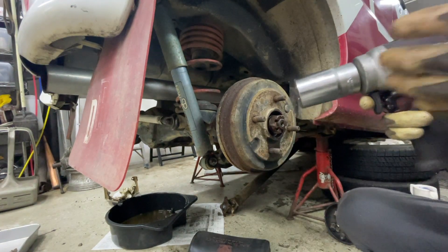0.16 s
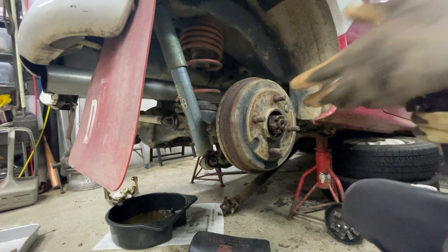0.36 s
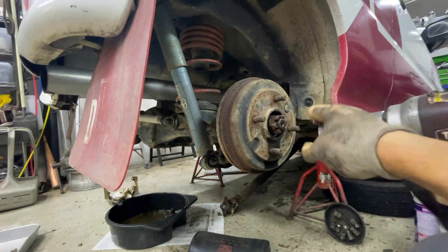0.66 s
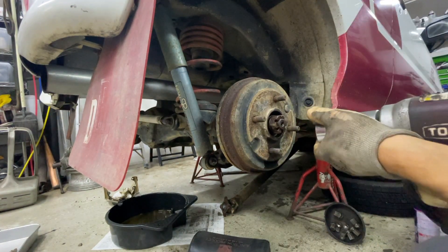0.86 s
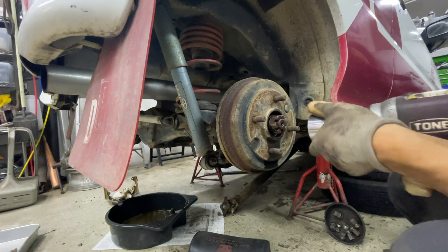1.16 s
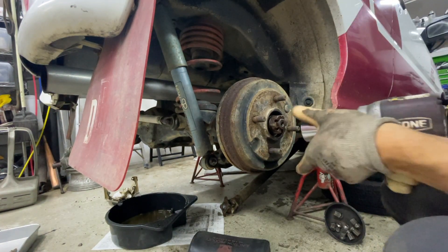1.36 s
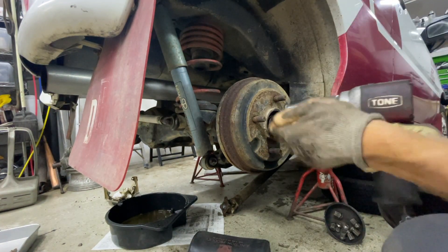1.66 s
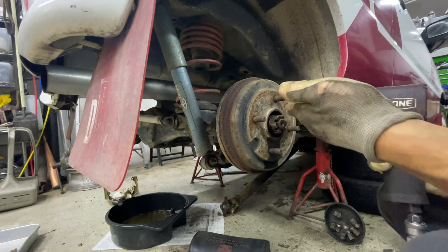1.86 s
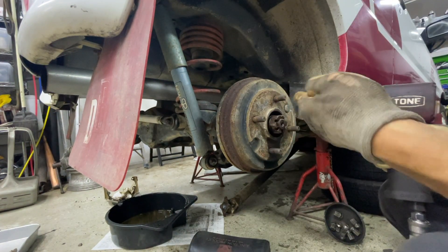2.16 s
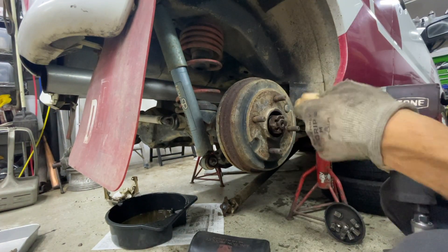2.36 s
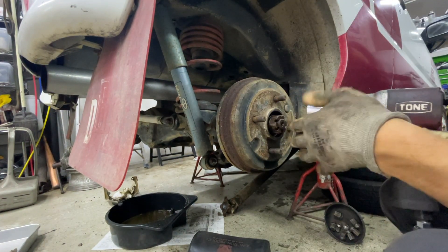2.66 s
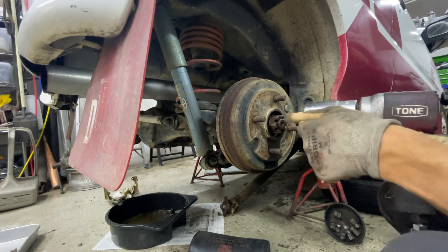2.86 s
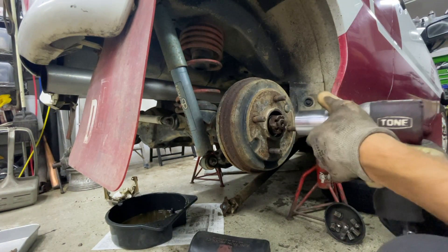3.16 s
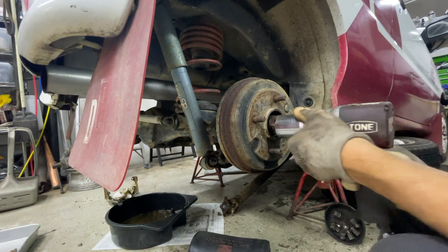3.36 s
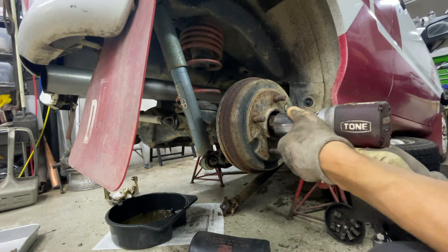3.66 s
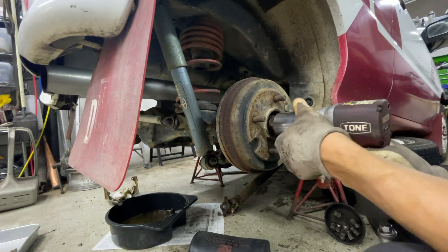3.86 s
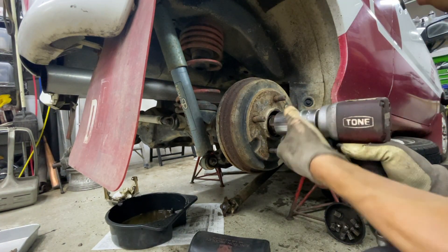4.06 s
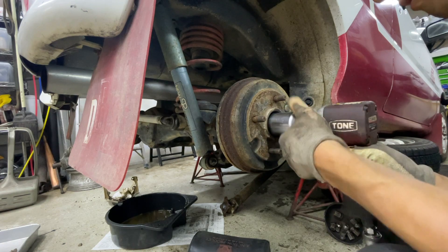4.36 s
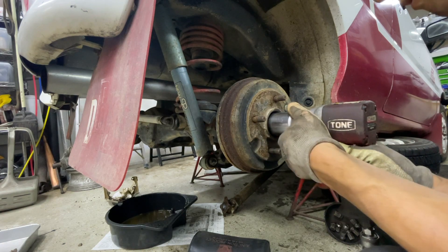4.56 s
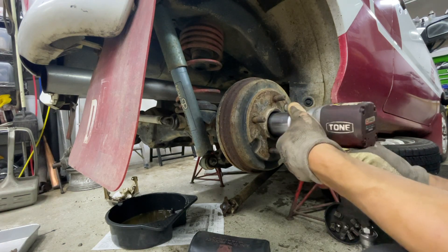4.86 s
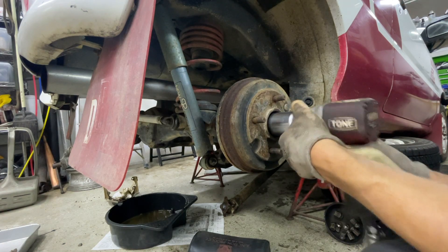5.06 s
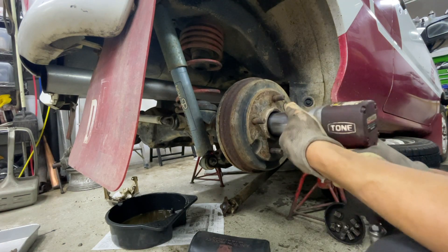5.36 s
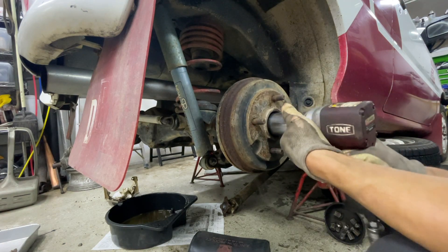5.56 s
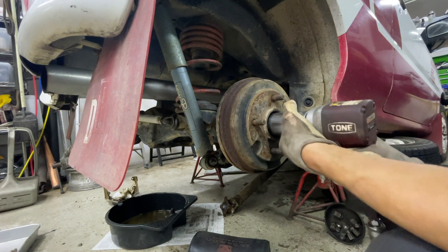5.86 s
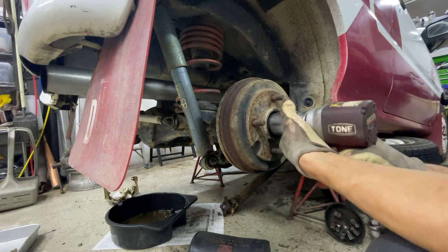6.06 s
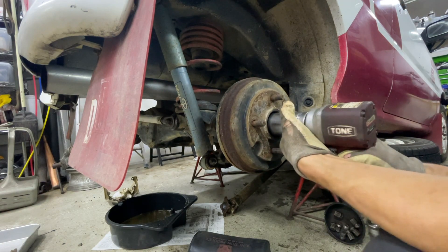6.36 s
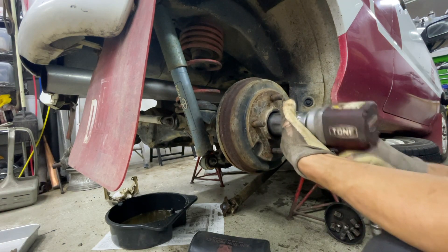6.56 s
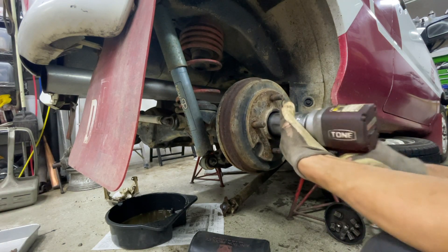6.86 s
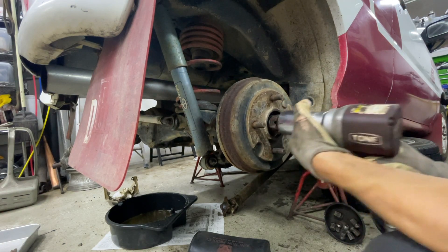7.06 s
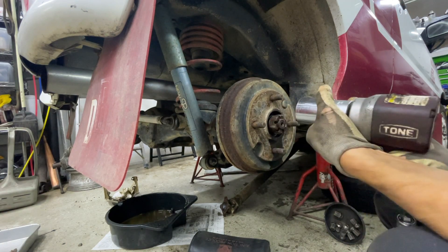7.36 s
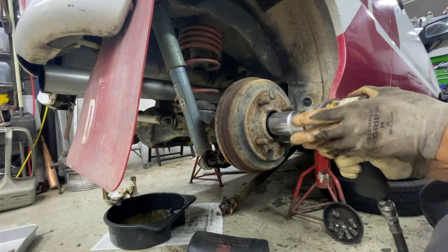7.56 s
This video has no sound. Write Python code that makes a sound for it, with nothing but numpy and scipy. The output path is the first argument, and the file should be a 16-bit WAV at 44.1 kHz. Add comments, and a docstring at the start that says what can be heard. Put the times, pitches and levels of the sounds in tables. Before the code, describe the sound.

Over a chugging compressor, a close air impact wrench gives a quick blip, then rattles loudly against a wheel hub nut, pausing briefly twice.

```python
"""Impact wrench and air compressor in a garage

Close by, an air impact wrench is blipped once, then hammers on a tight hub nut in three bursts.
Each impact excites a broad crack and the damped modes of socket, anvil and brake drum; the exhaust
hisses, and early puffs of it thump against the microphone. A piston compressor chugs in harmonics
of its crank rate and sinks behind the wrench while that is loud."""
import sys
import numpy as np
from scipy import signal
from scipy.fft import rfft, irfft, next_fast_len
from scipy.io import wavfile
from scipy.ndimage import uniform_filter1d

SR = 44100
rng = np.random.default_rng(int(sys.argv[2]) if len(sys.argv) > 2 else 0)


def wav_record(signal):
    """Record a signal, one row per channel, as 16-bit PCM in the file named by sys.argv[1]."""
    frames = np.transpose(np.atleast_2d(signal))
    bounded = np.clip(frames, -1, 1)
    # unit amplitude maps onto the largest positive 16-bit level
    quanta = np.round(bounded * 32767).astype(np.int16)
    wavfile.write(sys.argv[1], SR, quanta)


N = 340359
T = np.arange(N) / SR

# Hammer blows: t/s, level/dB, then relative to it hub/dB, socket/dB, anvil/dB, settling parts/dB
BLOWS = [(4.608, -20.5, -2.5, -16, 0.5, -8), (4.622, -17, 1, 1.0, -5.5, 2.5),
         (4.6376, -14, -1.5, -1, -9, -12), (4.652, -17, -4, 5, -1.5, -17),
         (4.696, -15, -11.5, -4, -1.0, -3), (4.737, -16.5, -6.5, 1, -7.5, -5),
         (4.784, -13.5, -8, 2.5, -8, -3.5), (4.9315, -16, -10, 2, -4, -15), (4.9804, -17, -7, 4, 0, -12),
         (5.026, -15, -6.5, 4, 0, -12), (5.0718, -18, -10, -7, -2, -2), (5.1174, -18.5, -13.5, -2, -2, -4),
         (5.1698, -21.5, -9, 2, -3, 2), (5.218, -19, -13.0, 0, 4, -2), (5.266, -16.5, -12.5, -9, -4, -3),
         (5.309, -18, -8.5, -7, -2, -2), (5.358, -17, -12.5, -9, -3.0, -13),
         (5.4045, -18.5, -14, 6, 1, -12), (5.453, -15.5, -13, -2, -3.0, -8), (5.5, -19.0, -23, 3, 5, -7),
         (5.5509, -19, -19, -3, -7.5, -11), (5.605, -18, -19.5, 2, 2, -2.5), (5.656, -18, -23, -2, 2, 0),
         (5.7095, -19, -22, -1, -1, -8), (5.7542, -16, -34, -2.5, -1, -6),
         (5.7989, -23, -15, -5, -1.5, -15), (5.8449, -17.5, -17, -6, 0, -13),
         (5.89, -19.5, -11, -4, -2, -14), (5.9351, -18.0, -15, -3.5, -9, -8),
         (5.9806, -23.5, -7, -11, 0.5, 1), (6.0288, -17, -18.5, -14, -6, -3),
         (6.0778, -21.5, -17.5, -2, 3, 3), (6.13, -21, -13, -5, -3, -9), (6.1839, -19.5, -14, -1, -7, -7),
         (6.2347, -17.5, -15.5, -11, -6.5, -9), (6.269, -24, -17, -6, -6, -13.5),
         (6.3262, -21, -16, -6, -1, 4), (6.3811, -20.5, -12, -6, -4, -16.5),
         (6.4297, -16.5, -14.5, -5.5, -2, -2), (6.4769, -22, -9, -5, -3, -3.5),
         (6.5231, -19, -15, -2.5, 3, 3), (6.5697, -20, -12, -7, -2.0, -5),
         (6.6158, -19.5, -14, 1.5, 1.5, -8), (6.6611, -21, -9.5, -5, -9, -3.5),
         (6.7061, -18, -17, -0.5, -7, -2), (6.7524, -18.5, -10.5, -9, -12.0, -14),
         (6.7978, -18.5, -16, -11.5, -4.5, 0.5), (6.843, -18.5, -8.5, -6, -14, -16),
         (6.889, -20, -16, -13, -10.5, -6), (6.9347, -18, -10, -5, -13.5, -15.0),
         (7.415, -18.5, -24.5, -7, 2.5, 8), (7.457, -17, -16, -16, -5.0, -8.0),
         (7.51, -13.5, -24, -6, -3, 3.5), (7.554, -13, -18, -6, 3, 0), (7.5983, -13, -18, -11, 4, -9),
         (7.6399, -14, -19, -5, -2.0, 0), (7.685, -16, -14.5, -3, 4, -7)]
# Spectra of the crack and of the hub's knock: f/Hz, density/dB
CRACK_SPECTRUM = [(1470, -13), (2500, -9), (4050, -12.5), (5150, -5), (5390, -10), (5650, -12), (6760, 3),
                  (7470, -8.5), (8330, -0.5), (10300, -12), (12600, -5), (14000, -17), (16000, -15.5)]
HUB_SPECTRUM = [(60, -33.5), (251, 3), (557, 1.5), (639, -1), (1220, -1.5), (1370, -3), (3500, -11.5),
                (4550, -9), (7700, -120)]
# Modes of socket (first six) and anvil, and of the brake drum: f/Hz, level/dB, T60/s
STEEL_MODES = [(5232, -6.5, 0.046), (6250, -4, 0.034), (6600, -5, 0.018), (6715, -0.5, 0.05),
               (6890, -2.5, 0.017), (8300, -9, .012), (13130, -9.5, .04), (13640, 0, .04),
               (13800, -5.5, .03)]
DRUM_MODES = [(1414, 20, 0.034), (1900, 17.5, 0.034), (2244, 6.5, 0.05)]
# Changing strength of the clank of drum and hub plate: t/s, gain/dB
CLANK_GAIN = [(4.62, -17.5), (4.7, -16.5), (5.8, -10.5), (6.5, -3), (7.0, -11), (7.4, -0.5), (7.7, -5)]

def wrench(crack_db=-2, socket_db=-3, anvil_db=-9, drum_db=9, muffle_hz=9000, knock_lag_samples=70):
    """Impact excitation: blows and air flow drive a broad crack, the hub and the modes of the steel."""
    s, db, hub_rel, socket_rel, anvil_rel, settling_db = np.transpose(BLOWS)
    pan_db = 0.4 - 0.5 * rng.standard_normal(len(s))
    levels_db = db + np.array([0 * db, hub_rel, socket_rel, anvil_rel])
    (steel, hub, socket, anvil), sides = impacts(s, levels_db, pan_db, settling_db)
    air_high, air_low = air_motor()
    crack_noise, hub_noise, ring_noise = rng.standard_normal((3, 2, N))
    exhaust = signal.sosfilt(signal.butter(1, muffle_hz, fs=SR, output="sos"), crack_noise * air_high)
    crack = colour(crack_noise * gain_of(crack_db) * steel + exhaust, CRACK_SPECTRUM)
    knock = colour(hub_noise * (np.roll(hub, knock_lag_samples) + gain_of(-6) * air_low), HUB_SPECTRUM)
    bell = ring(ring_noise * (gain_of(socket_db) * socket + gain_of(-4) * air_high), STEEL_MODES[:6])
    bell += ring(ring_noise * (gain_of(anvil_db) * anvil + gain_of(-14) * air_high), STEEL_MODES[6:])
    bell += ring(ring_noise[::-1] * gain_of(drum_db + contour(CLANK_GAIN)) * hub, DRUM_MODES)
    return stereo(crack + knock + bell + cam(), NEAR_SIDE, NEAR_COHERENCE) * sides


def impacts(times, levels_db, pans_db, settling_db, rise_s=0.0016, fall_s=0.0025, bounce_s=.0045):
    """Contact forces of strike, settling, bounce and tick: an envelope per level row, and pan gains."""
    t = np.arange(2200) / SR
    force, pan_db = np.zeros((len(levels_db), N)), np.zeros(N)
    chance = rng.standard_normal((len(times), 2))
    for s, db, pan, loose, (lag, vigour) in zip(times, levels_db.T, pans_db, gain_of(settling_db), chance):
        since_bounce = t - bounce_s * (1 + 0.22 * lag)
        bounce = gain_of(-5.5 + 2 * vigour) * np.exp(-abs(since_bounce) / fall_s) * (since_bounce > 0)
        settling = loose * np.exp(-t / (0.0046 * (1 + loose)))
        strike = (1 - np.exp(-t / rise_s)) * (np.exp(-t / fall_s) + settling)
        tick = gain_of(-6 + 2 * vigour) * np.exp(-abs(t - .001) / 0.00065)
        add(force, s - .001, gain_of(db)[:, None] * (strike + bounce + tick) / (1 + loose))
        pan_db[round(s * SR) - 100:] = pan
    pan_db = uniform_filter1d(pan_db, 100)
    return force, gain_of([pan_db / 2, -pan_db / 2])


def hub_plate(sweep_hz=2300, end_hz=1380, glide_s=0.00131, fall_s=0.0028, spread=0.147, plate_db=13.5):
    """Bending wave: the hub plate flexes under each blow, giving a short falling chirp."""
    out, t = np.zeros((2, N)), np.arange(900) / SR
    for (s, db, hub_rel, *_), (pitch, side) in zip(BLOWS, rng.standard_normal((len(BLOWS), 2))):
        hz = end_hz * (1 + spread / 4 * side) + sweep_hz * np.exp(2 * spread * pitch - t / glide_s)
        chirp = np.sin(2 * np.pi * np.cumsum(hz) / SR) * np.exp(-t / fall_s)
        gain = gain_of(db + hub_rel + plate_db + contour(CLANK_GAIN, s))
        add(out, s + 0.00054, gain * chirp * panned(1.6 * side))
    return out


# Pulls of the trigger: start/s, end/s, steady air level/dB, opening surge/dB
TRIGGER_PULLS = [(4.598, 4.82, -53.5, 22), (4.899, 6.953, -46.5, 4.5), (7.405, 7.73, -41.5, -10)]

def air_motor(surge_s=0.052, rattle_db=3.5, swell_db=0.5, clacks_per_s=70, clack_s=0.0019):
    """Amplitude modulation: loose vanes and cage roughen the exhaust's treble and bass envelopes."""
    high, low = np.zeros((2, 1, N))
    for start, end, db, surge_db in TRIGGER_PULLS:
        t = np.arange(0, end - start, 1 / SR)
        surge = np.exp(-t / surge_s)
        flow = gain_of(db + surge_db * surge)[None] * signal.windows.tukey(len(t), 0.031 / (end - start))
        add(high, start, flow)
        add(low, start, flow * gain_of(-2 + 13 * surge))
    rattle = gain_of(rattle_db * drift(90) + swell_db * drift(4000))
    age = np.arange(0, 8 * clack_s, 1 / SR) / clack_s
    clacks = (rng.random(N) < clacks_per_s / SR) * rng.exponential(1, N)
    rattle *= 1 + gain_of(1) * signal.oaconvolve(clacks, age * np.exp(1 - age))[:N]
    return high * rattle, low * rattle


# Spectra of the cam catching and of the motor straining: f/Hz, density/dB
CATCH_SPECTRUM = [(1100, -18.5), (2000, 1), (3600, -6.5), (5200, 2), (6500, -14.5), (11500, -9)]
STRAIN_SPECTRUM = [(350, -30), (600, 0), (1100, -1), (1700, -30)]

def cam(delay_s=0.0284, scatter_s=0.00096, catch_db=-21, click_s=0.0016, strain_db=-25, strain_s=0.0093):
    """Load and release: between blows the cam clacks, then the motor strains until the hammer slips."""
    force, t = np.zeros((2, N)), np.arange(1300) / SR
    click = t / click_s * np.exp(1 - t / click_s)
    build_up = np.exp((t - t[-1]) / strain_s)
    for (s, db, *_), (late, size) in zip(BLOWS[4:], rng.standard_normal((len(BLOWS), 2))):
        add(force[:1], s + delay_s + scatter_s * late, gain_of(db + catch_db + 4 * size) * click[None])
        add(force[1:], s - t[-1], gain_of(db + strain_db) * build_up[None])
    running = sum((T > start) * (T < end) for start, end, *_ in TRIGGER_PULLS)
    catch, strain = rng.standard_normal((2, 2, N)) * (force * running)[:, None]
    return colour(catch, CATCH_SPECTRUM) + colour(strain, STRAIN_SPECTRUM)


# Low thumps of exhaust air puffing against the microphone: t/s, level/dB, T60/s, left minus right/dB
THUMPS = [(0.925, -12, 0.092, 3), (4.634, -12.5, 0.048, 6), (4.702, -28, 0.61, -28),
          (4.745, -29.5, 0.39, -26), (4.791, -13.5, 0.36, -8.5), (4.986, -26, 0.043, 11),
          (5.032, -12, 0.05, 4), (5.267, -31, 0.091, 2), (5.315, -24.5, 0.052, 28)]

def thumps(sweep_hz=1100, end_hz=54, glide_s=0.00458, apart_turns=.11, rumble_db=-27, rumble_t60=0.62):
    """Pressure pulse: each puff falls fast to a low boom, out of step left and right, then rumbles."""
    out, rumble, t = np.zeros((2, N)), np.zeros((1, N)), np.arange(SR // 4) / SR
    turns = np.cumsum(end_hz + sweep_hz * np.exp(-t / glide_s)) / SR
    offset = np.outer([-apart_turns, apart_turns], 1 - np.exp(-(t / 0.0068) ** 2))
    wave = np.sin(2 * np.pi * (turns + offset)) * (1 - np.exp(-(t / 0.009) ** 2))
    head = gain_of(3) * np.exp(-(t / 0.013) ** 2)
    for s, db, t60, pan_db in THUMPS:
        boom = gain_of(-8 - 60 * t / t60) * panned(pan_db)
        add(out, s - .006, gain_of(db) * wave * (head + boom))
        add(rumble, s, gain_of(db + rumble_db - 60 * T[None, :SR // 2] / rumble_t60))
    band = signal.butter(2, [35, 110], "band", fs=SR, output="sos")
    return out + rumble * unit_rms(signal.sosfilt(band, rng.standard_normal((2, N))))


# Knocks of the unloaded hammer cage: t/s, level/dB
CAGE_KNOCKS = [(0.9052, -18.5), (0.9181, -13), (0.924, -21), (0.9342, -12), (0.943, -17.5), (0.95, -20),
               (0.9643, -17), (0.993, -15), (1.004, -27), (1.01, -17.5), (1.0257, -17)]
# A faint scrape, then the blip's puff of air: t/s, level/dB
BLIP_LEVEL = [(.74, -61.5), (.8, -50.5), (.86, -52), (.9, -43), (.93, -61.5), (1.04, -46.5), (1.1, -53.5),
              (1.16, -51), (1.22, -57.5)]
# Spectrum of the free-running tool: f/Hz, density/dB
BLIP_SPECTRUM = [(100, -19), (206, -3), (260, -13), (524, -6), (595, -20), (648, -7), (691, -28.5),
                 (1280, 1.5), (2800, -10), (7140, -8.5), (12700, -12.5), (16000, -24)]
# Modes of the hammer cage: f/Hz, level/dB, T60/s
CAGE_MODES = [(1163, -5.5, 0.012), (1290, 0, 0.012), (5080, -8, 0.008), (7160, 1.5, 0.012)]

def blip(rattle_db=-3.5, cage_db=-7, settling_db=-8, scatter_db=9):
    """Forced vibration: a scrape, loose knocks and a puff of air ring the free-running tool's cage."""
    s, db = np.transpose(CAGE_KNOCKS)
    pan_db = scatter_db * rng.standard_normal(len(s))
    force, sides = impacts(s, db[None], pan_db, np.full(len(s), settling_db))
    scrape_and_puff = gain_of(contour(BLIP_LEVEL, left=-200, right=-200))
    drive = rng.standard_normal((2, N)) * (gain_of(rattle_db) * force + scrape_and_puff)
    cage = gain_of(cage_db) * ring(drive, CAGE_MODES)
    return stereo(colour(drive, BLIP_SPECTRUM) + cage, NEAR_SIDE, NEAR_COHERENCE) * sides


# Two rises and a run-down of the unloaded motor: t/s, length/s, first f/Hz, last f/Hz, level/dB
MOTOR_GLIDES = [(0.916, 0.033, 1127, 1455, -26), (0.979, 0.038, 1087, 1310, -27),
                (1.028, 0.11, 276.5, 211, -43)]

def motor_whine(octave_db=-13, waver=0.038):
    """Rotational tone: a fundamental and its octave glide unsteadily with the motor's speed."""
    out = np.zeros((2, N))
    for start, length, from_hz, to_hz, db in MOTOR_GLIDES:
        t = np.arange(0, length, 1 / SR)
        hz = (from_hz + (to_hz - from_hz) * t / length) * (1 + waver * drift(120, len(t)))
        phase = 2 * np.pi * np.cumsum(hz) / SR
        tone = np.sin(phase) + gain_of(octave_db) * np.sin(2 * phase)
        add(out, start, gain_of(db) * tone[None] * signal.windows.tukey(len(t), .5))
    return out


# Light taps of the socket: t/s, level/dB, then relative to it high ring/dB, low ring/dB
SOCKET_TAPS = [(1.156, -34, -40, -25), (3.365, -49, -4, 18), (4.104, -50, 15, -10), (4.154, -32, -30, -10)]
# Spectrum of a tap: f/Hz, density/dB
TAP_SPECTRUM = [(1200, -10), (3100, 0), (4600, -1), (5600, -9), (6800, -3), (8300, 0), (10000, -9),
                (16000, -13)]
# Faint scrape before the blip: t/s, level/dB
SCRAPE_LEVEL = [(.75, -72), (.77, -50), (.84, -46.5), (.89, -62), (.91, -70)]
# Modes of the free socket, tapped and scraped: f/Hz, level/dB, T60/s
HIGH_MODES = [(6830, 0, 0.059)]
LOW_MODES = [(1200, 0, .03), (3200, -3, .045)]
SCRAPE_MODES = [(3350, -7, .012), (4300, 0, .012), (7200, -4, .015)]
# The socket singing on after the blip: t/s, f/Hz, level/dB, T60/s, length/s
AFTER_RING = (1.03, 6620, -57.5, 2.5, .46)

def free_socket():
    """Free vibration: taps and a scrape ring the socket, and one thin tone lingers after the blip."""
    force, t = np.zeros((3, N)), np.arange(400) / SR
    for s, db, high_db, low_db in SOCKET_TAPS:
        add(force, s, gain_of([[db], [db + high_db], [db + low_db]]) * np.exp(-t / 0.0035))
    click, high, low = force[:, None] * rng.standard_normal((3, 2, N))
    taps = colour(click, TAP_SPECTRUM) + ring(high, HIGH_MODES) + ring(low, LOW_MODES)
    scrape = gain_of(contour(SCRAPE_LEVEL, left=-200, right=-200)) * rng.standard_normal(N)
    start, hz, db, t60, length = AFTER_RING
    gate = np.clip(np.minimum(T - start, start + length - T) / .05, 0, 1)
    tone = gain_of(db - 60 * (T - start) / t60) * np.sin(2 * np.pi * hz * T) * gate
    return taps + ring(scrape[None], SCRAPE_MODES) + tone


CRANK_HZ = 17.48
# Resonances of tank and housing: f/Hz, width/Hz, level/dB
HOUSING_RESONANCES = [(80, 51, -7.5), (146.2, 14.7, -2), (197.9, 33.6, -3), (282.2, 18, -6.5),
                      (321, 36, -8.5), (373.5, 33, -8.5), (455, 27.6, -1.5), (511, 43, -3),
                      (560, 147, -11.5), (714.5, 42, -7), (803.7, 51.4, -3)]

def housing(order_count=48, bass_edge_hz=30):
    """Resonant filtering: the low crank orders and their levels in dB under tank and housing peaks."""
    orders = np.arange(1, order_count + 1)
    hz = orders * CRANK_HZ
    power = sum((gain_of(db) * peak(hz, centre, width)) ** 2 for centre, width, db in HOUSING_RESONANCES)
    return orders, 10 * np.log10(power / (1 + (bass_edge_hz / hz) ** 8))


# Spectrum of valve clatter and hiss: f/Hz, density/dB
VALVE_SPECTRUM = [(700, -24), (850, -9.5), (1020, -12.5), (1340, -12), (1460, -5.5), (1720, -9),
                  (1850, -13.5), (2730, -22.5), (3990, -28), (4570, -22), (5560, -32), (6900, -28.5),
                  (7300, -39), (8240, -25.5), (10300, -39.5), (11000, -34.5), (14000, -31.5), (16000, -50)]
# Valve reeds ringing on every stroke: f/Hz, width/Hz, boost/dB
REED_RESONANCES = [(1620, 260, 5), (4490, 420, 8), (8270, 200, 8), (10940, 200, 9.5)]

def piston(crank, low_orders, low_db, order_db=-43.5, clatter_db=-48, vary_db=.9, steps=16384):
    """Fourier series: crank harmonics of random phase make nearly the same stroke on every turn."""
    orders = np.arange(1, 700)
    hz = orders * CRANK_HZ
    size = gain_of(spectrum_at(VALVE_SPECTRUM, hz)) * rng.rayleigh(1, (2, len(hz)))
    size *= orders > low_orders[-1]
    size *= gain_of(clatter_db) / np.linalg.norm(size[0])
    size *= gain_of(sum(db * peak(hz, centre, width) for centre, width, db in REED_RESONANCES))
    size[:, low_orders - 1] = gain_of(order_db + low_db)
    harmonics = size * np.exp(2j * np.pi * rng.random(size.shape))
    cycles = irfft(np.pad(harmonics, ((0, 0), (1, 0))), steps) * steps / np.sqrt(2)
    strokes = np.array([np.interp(crank, np.arange(steps) / steps, cycle, period=1) for cycle in cycles])
    return strokes * gain_of(vary_db * drift(1500))


# The compressor sinking behind the wrench: t/s, gain/dB
COMPRESSOR_GAIN = [(0, 3), (.9, 3), (.97, -2), (1.05, -13.5), (1.14, -15), (1.22, -5), (1.3, 0.5),
                   (4.6, 0.5), (4.67, -13.5), (4.9, -27), (5.4, -41), (7.0, -22.5), (7.4, -26.5),
                   (7.72, -39)]
# Bands that swell once a turn: low f/Hz, high f/Hz, depth (0-1), phase of maximum/turns
THROB_BANDS = [(40, 120, .25, .45), (400, 950, .36, .4), (1350, 1800, .42, .22)]

def compressor(roar_db=-36, hiss_db=-43, hiss_sink=0.85):
    """Periodic modulation: piston strokes, resonant roar and valve hiss throb at the crank rate."""
    crank = T * CRANK_HZ % 1
    orders, low_db = housing()
    strokes = piston(crank, orders, low_db)
    roar_noise, hiss_noise = rng.standard_normal((2, 2, N))
    hz = orders * CRANK_HZ
    dip_db = 4 * np.exp(-((hz - 485) / 90) ** 2)  # less noise here leaves the harmonics clearer
    roar_spectrum = [*zip(hz, low_db - dip_db), (950, -35), (1500, -70)]
    roar = gain_of(roar_db + 0.4 * np.cos(2 * np.pi * (crank - .42))) * colour(roar_noise, roar_spectrum)
    hiss = gain_of(hiss_db) * colour(hiss_noise, VALVE_SPECTRUM)
    heard_db = contour(COMPRESSOR_GAIN)
    chug = (strokes + roar) * gain_of(heard_db) + hiss * gain_of(hiss_sink * heard_db)
    throb = np.zeros((2, N))
    for low_hz, high_hz, depth, at in THROB_BANDS:
        band = signal.butter(2, [low_hz, high_hz], "band", fs=SR, output="sos")
        throb += depth * np.cos(2 * np.pi * (crank - at)) * signal.sosfiltfilt(band, chug)
    return stereo(chug + throb, FAR_SIDE, FAR_COHERENCE) * panned(0.16)


# Reverberation time of the garage: f/Hz, T60/s
GARAGE_T60 = [(200, 0.28), (1400, 0.28), (4000, 0.38), (10000, 0.24), (16000, 0.036)]

def garage(x):
    """Reverberation: sparse reflections of random sign, each band decaying at its own rate."""
    echoes = np.zeros((2, SR // 2))
    at = np.arange(300, SR // 2 - 20, 20) + rng.integers(0, 20, (2, (SR // 2 - 301) // 20))
    np.put_along_axis(echoes, at, rng.choice([-1., 1.], at.shape), 1)
    hz, t, bands = signal.stft(echoes, SR, nperseg=256)
    decay = gain_of(-60 * t / spectrum_at(GARAGE_T60, hz)[:, None])
    tail = signal.istft(bands * decay, SR, nperseg=256)[1]
    return signal.fftconvolve(x, tail / np.linalg.norm(tail[0]), axes=1)[:, :N]


# Stereo width of wrench (near) and compressor (far): f/Hz, side minus mid/dB
NEAR_SIDE = [(99, 9.5), (160, 4), (270, -4.5), (450, -1.5), (740, -2), (1220, -2.5), (2010, -2),
             (3330, -0.5), (5500, -1), (9080, 4), (15000, -16)]
FAR_SIDE = [(60, -27.5), (99, -13.5), (160, -16), (270, -4), (450, -6.5), (740, -2), (1220, -1), (2010, 1),
            (3330, 0.5), (5500, -1), (9080, 4.5), (15000, -20)]
# How the side signal follows the mid: f/Hz, in-phase part, part a quarter cycle ahead
NEAR_COHERENCE = [(297, -0.16, -0.19), (985, -0.25, 0.97), (1640, -0.35, -1), (2850, -0.1, -1.1),
                  (4400, 0.28, -0.26), (7100, 0.11, -0.43), (7700, -0.88, -1.03), (11000, -0.023, 0.82)]
FAR_COHERENCE = [(300, -0.11, -.2), (1100, 0.5, -0.52), (2000, 0.24, -.5), (4500, 0.48, 0),
                 (8780, -0.19, 0)]

def stereo(pair, side_db, coherence):
    """Partial coherence: left and right are the mid plus and minus a side that partly follows it."""
    size = next_fast_len(N)
    hz = np.fft.rfftfreq(size, 1 / SR)
    f, in_phase, ahead = np.transpose(coherence)
    tied = np.interp(hz, f, in_phase + 1j * ahead)
    mid, other = rfft(pair, size)
    side = tied * mid + np.sqrt(np.clip(1 - abs(tied) ** 2, 0, 1)) * other
    side = irfft(side * gain_of(spectrum_at(side_db, hz)), size)[:N]
    return np.array([pair[0] + side, pair[0] - side])


def ring(drive, modes):
    """Modal response: convolution with a sum of damped sinusoids of unit total energy."""
    t = np.arange(SR // 8) / SR
    response = sum(gain_of(db - 60 * t / t60) * np.sin(2 * np.pi * hz * t) for hz, db, t60 in modes)
    return signal.oaconvolve(drive, response[None] / np.linalg.norm(response), axes=1)[:, :N]


def colour(x, points):
    """Spectral shaping that conserves the power of white input."""
    size = next_fast_len(x.shape[-1])
    shape = gain_of(spectrum_at(points, np.fft.rfftfreq(size, 1 / SR)))
    return irfft(rfft(x, size) * unit_rms(shape), size)[..., :x.shape[-1]]


def spectrum_at(points, hz):
    """Interpolation in log frequency."""
    f, value = np.transpose(points)
    return np.interp(np.log(hz + 1), np.log(f + 1), value)


def contour(points, t=T, **ends):
    """Interpolation in time."""
    return np.interp(t, *np.transpose(points), **ends)


def peak(hz, centre, width):
    """Lorentzian resonance curve."""
    return 1 / (1 + (2 * (hz - centre) / width) ** 2)


def drift(window, n=N):
    """Moving-average noise of rms 1."""
    return unit_rms(uniform_filter1d(rng.standard_normal(n), window))


def gain_of(db):
    """Level to amplitude."""
    return 10 ** (np.asarray(db) / 20)


def unit_rms(x):
    """Normalisation to rms 1."""
    return x / np.sqrt(np.mean(x ** 2) + 1e-20)


def panned(pan_db):
    """Left and right gains for a level difference."""
    return gain_of([[pan_db / 2], [-pan_db / 2]])


def add(mix, s, sound):
    """Superposition of a sound at time s."""
    part = mix[:, round(s * SR):][:, :sound.shape[1]]
    part += sound[:, :part.shape[1]]


def scene():
    """Superposition: the tool, its deep bass filtered out, and its echo join thumps and compressor."""
    tool = blip() + motor_whine() + wrench() + hub_plate() + free_socket()
    near = signal.sosfilt(signal.butter(4, 95, "high", fs=SR, output="sos"), tool)
    return near + gain_of(-10) * garage(near) + thumps() + compressor()


def record(dry, edge_hz=15900):
    """Band limiting by a linear-phase low-pass."""
    return signal.oaconvolve(dry, signal.firwin(511, edge_hz, window=("kaiser", 9), fs=SR)[None], "same")


dry = scene()
out = record(dry)
wav_record(out)
```